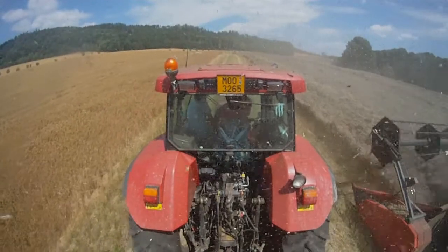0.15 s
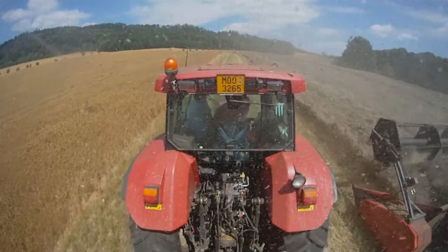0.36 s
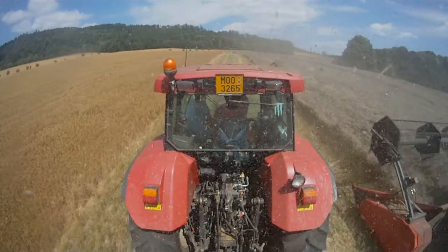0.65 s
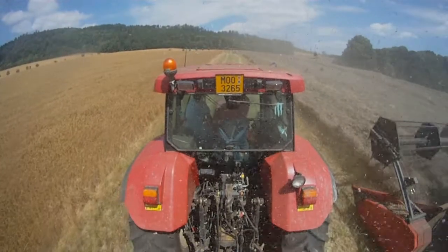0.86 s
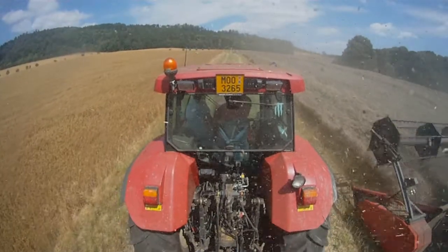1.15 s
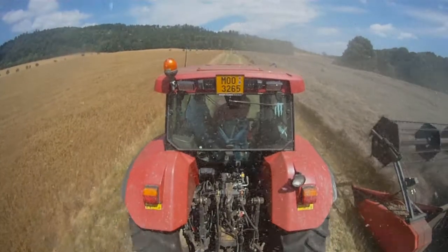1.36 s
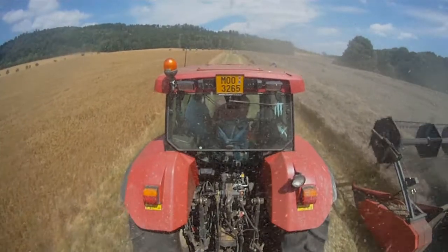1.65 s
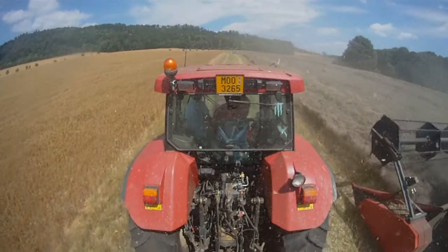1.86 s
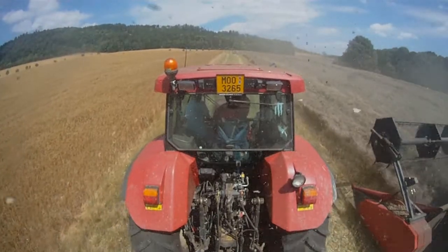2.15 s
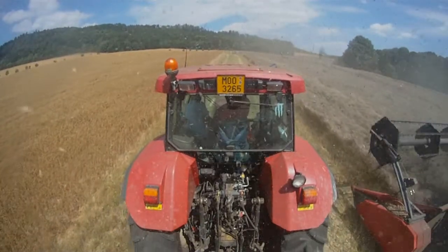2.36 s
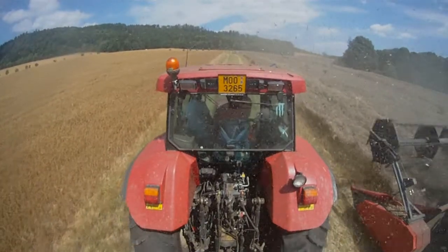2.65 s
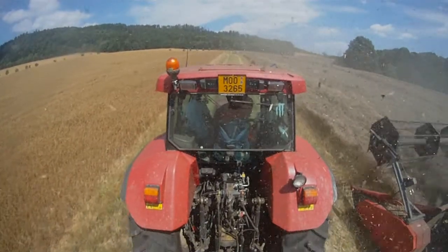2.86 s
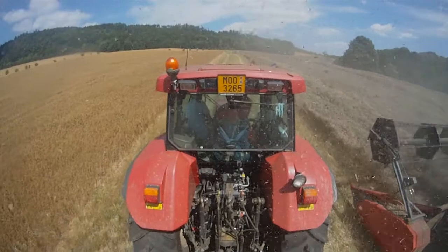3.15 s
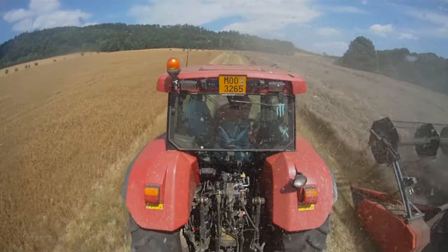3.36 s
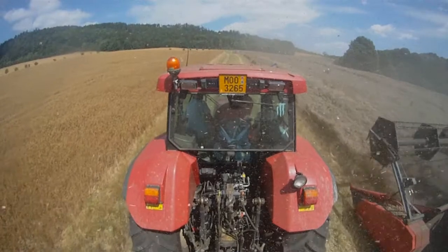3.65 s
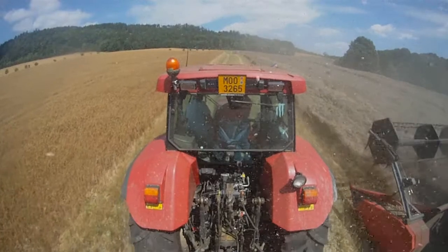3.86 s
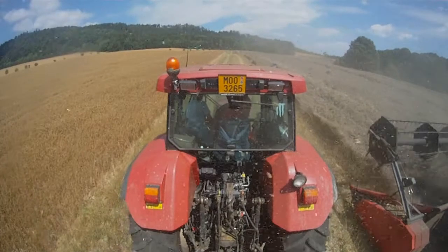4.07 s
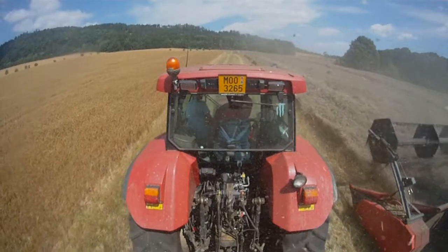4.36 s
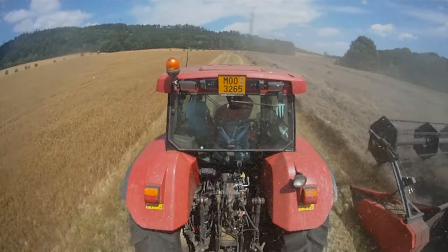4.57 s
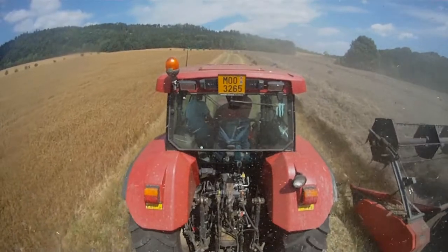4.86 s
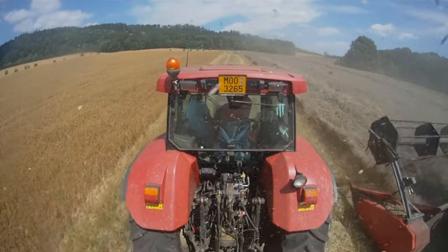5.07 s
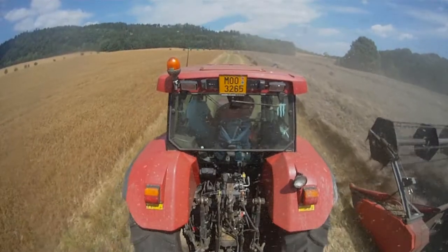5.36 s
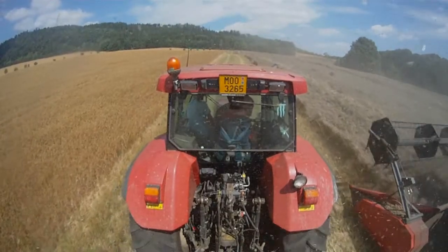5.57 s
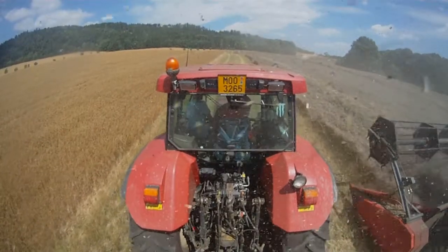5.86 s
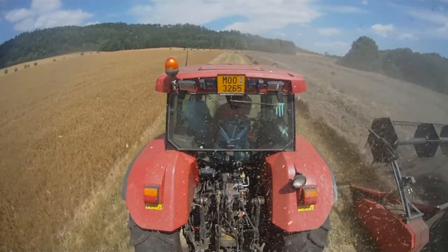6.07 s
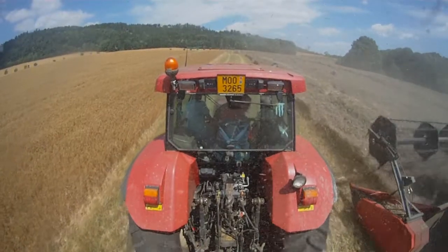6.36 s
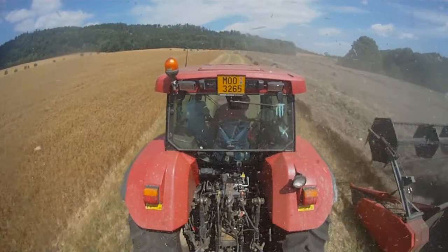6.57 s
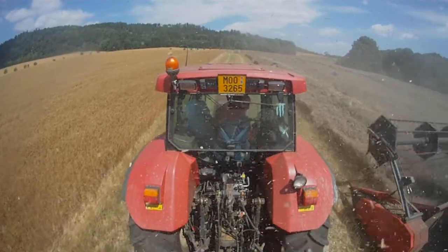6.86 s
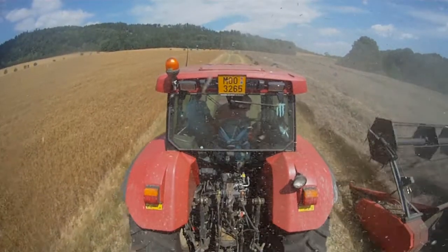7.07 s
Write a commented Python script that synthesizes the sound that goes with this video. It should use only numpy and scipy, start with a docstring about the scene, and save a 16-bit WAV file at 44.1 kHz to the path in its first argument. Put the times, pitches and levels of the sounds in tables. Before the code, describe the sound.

Sharp, bright clicks of kernels on hard plastic sit in front of the continuous roar and whine of a working combine. The microphone rides on a grain trailer in an open field, pelted by chaff. An opening flurry eases, builds into a dense rattling shower, then drops to scattered ticks. The hardest hits distort slightly, and occasional light knocks travel up the mount while the machinery keeps running.

```python
"""Sharp clicks of grain on hard plastic are heard first, over the roar and whine of a working combine.
Kernels and chaff strike the housing of a small camera on a grain trailer, singly and in showers.
Each impact excites the damped normal modes of the shell, and the hardest overload the microphone.
The machines give broadband noise with resonant peaks, wavering tones and a low hum;
now and then a jolt sets the panels ringing or a dull knock travels up the mount."""
import sys
import numpy as np
from scipy import signal
from scipy.fft import rfft, irfft
from scipy.io import wavfile
from scipy.ndimage import uniform_filter1d

SR = 44100
rng = np.random.default_rng(int(sys.argv[2]) if len(sys.argv) > 2 else 0)


def store_wav(level_fs):
    """Save 16-bit WAV to argv[1]."""
    pcm = np.round(np.clip(np.atleast_2d(level_fs), -1, 1) * 32767)
    wavfile.write(sys.argv[1], SR, pcm.T.astype(np.int16))


N = 318843

# broadband roar of the machines: (frequency [Hz], relative spectral density [dB])
ROAR_SPECTRUM = [(15, -58), (25, -34), (99, -26), (173, -19), (433, -19), (1050, -9.5), (1140, -10),
                 (1240, -11.5), (1800, -3), (2560, -14.5), (3090, -5), (4150, -15.5), (5280, -13),
                 (8350, -22), (15500, -46)]
# whines of shafts, fans and shell: (frequency [Hz], width [Hz], relative level [dB])
WHINE_BANDS = [(172, 9.7, -27), (290.4, 11, -32), (701.6, 120, -18), (1433, 180, -10.5), (1739, 56, -8),
               (1825, 94, -6), (1895, 23, -8.5), (2026, 230, -10), (2000, 18, -17), (3270, 260, -19.5),
               (4490, 110, -18.5), (5120, 1300, -7)]
# uncorrelated stereo part of the roar: (frequency [Hz], side relative to mid [dB])
ROAR_SIDE = [(40, -3), (110, -8), (200, -12), (380, -16), (780, -21), (950, -90)]
# envelope of the roar: (time [s], level [dB])
ROAR_ENVELOPE = [(0, -26), (1.09, -26.5), (1.9, -28), (2.54, -25.5), (3.4, -28), (3.92, -26.5),
                 (4.5, -28.5), (6.1, -29), (7.23, -29.5)]
# squeaks of a belt or bearing: (centre time [s], half duration [s], level [dB])
SQUEAKS = [(.95, .07, -44), (6.08, .04, -38)]
# faint tones of the shafts: (frequency [Hz], level [dB])
SHAFT_TONES = [(481, -58), (718, -58), (938, -55), (1120, -52)]
# normal modes of the housing: (frequency [Hz], relative level [dB], nominal 60 dB decay time [s])
SHELL_MODES = [(1743, -12.5, 0.023), (1847, -13, .02), (2144, -8.5, 0.015), (1484, -20.5, 0.0085),
               (2420, -11.5, 0.011), (2950, -6, 0.024), (3286, -10.5, 0.026), (3944, -9, 0.021),
               (4466, -7, 0.019), (5140, -6.5, 0.018), (5330, -7.5, 0.015), (5890, -11, 0.02),
               (6370, -0.5, 0.0086), (7146, -6.5, 0.0091), (8280, -1.5, 0.0074), (9270, -5.5, 0.0048),
               (9820, -11.5, 0.009), (11170, -8, 0.0072), (13400, -26, .003)]
# normal modes of the mount: (frequency [Hz], relative level [dB], nominal 60 dB decay time [s])
MOUNT_MODES = [(174, 0.5, 0.064), (340, -22, 0.06), (467, -17.5, 0.075), (724, 5, 0.028),
               (1010, -1.5, 0.024)]
# soft jolts of the machinery: (time [s], gain [dB])
MACHINE_JOLTS = [(0.466, 1), (0.742, -2), (1.718, -9), (1.9905, -4), (2.049, -6), (2.319, -1.5),
                 (2.4605, 1), (3.9978, -1.5), (4.2146, -2), (4.341, -3.5), (6.4313, -7), (7.064, -13.5)]
# knocks through the mount: (time [s], gain [dB], extra gain of the lowest mode [dB])
MOUNT_KNOCKS = [(0.588, -22, -24), (0.819, -24.5, -25), (1.745, -28, -11), (2.529, -17, -15),
                (2.603, -26, -11), (2.76, -23, -25), (3.188, -22, -16), (3.756, -20, -9), (4.077, -21, -30),
                (4.259, -20, -39), (4.574, -28, -24), (4.763, -19, -7.5), (5.765, -30, -2),
                (5.843, -22.5, -7.5), (6.768, -22, -6)]
# envelope of the shower of chaff and small grain: (time [s], level [dB])
SHOWER_ENVELOPE = [(0.0, -36.5), (0.35, -24.5), (0.78, -33.5), (1.2, -37), (1.45, -32.5), (1.75, -41),
                   (2.1, -48), (2.35, -27), (2.75, -18.5), (2.95, -28), (3.05, -36), (3.42, -25.5),
                   (3.6, -36.5), (4.35, -39.5), (4.95, -43.5), (5.25, -34), (5.64, -37), (6.0, -36.5),
                   (7.23, -34.5)]
# denser handfuls on top of the shower: (onset [s], duration [s], level [dB])
CHAFF_HANDFULS = [(0.188, 0.041, -23.5), (0.293, 0.024, -28), (0.356, 0.039, -24), (0.434, 0.039, -22.5),
                  (0.54, .03, -23), (1.087, 0.055, -25.5), (1.48, .17, -29), (2.175, 0.084, -23.5),
                  (2.384, 0.052, -15), (2.587, 0.095, -24), (2.814, 0.087, -22), (3.107, .1, -21.5),
                  (3.285, 0.027, -24), (5.038, 0.086, -29), (5.386, 0.087, -35), (5.98, .13, -32),
                  (6.655, 0.074, -28.5), (6.866, 0.043, -33.5)]
# the loudest kernels: (time [s], gain before clipping [dB], centre of the ring [Hz],
# low modes relative to upper [dB], nominal contact time [ms])
KERNEL_IMPACTS = [(0.0224, 11, 5330, -12.5, 4), (0.0317, 4, 4460, -13, 1.8),
                  (0.1242, 6.5, 6030, -11.5, 2.2), (0.1955, -1, 4340, -12, 2.8),
                  (0.1995, -5.5, 5200, -18, 5.4), (0.2138, -6, 5550, -15, 3), (0.2311, -1, 5070, -20, 3.8),
                  (0.3348, 4, 5000, -8, 2.5), (0.347, 1.5, 6380, -9, 1.7), (0.352, 7, 6400, -14.5, 2.5),
                  (0.3656, -7, 6340, -8, 2.5), (0.4263, -2.5, 5250, -16, 1.7), (0.4358, -6, 6540, -10, 2.8),
                  (0.4487, -5.5, 5380, -4.5, 3.2), (0.4544, -8, 5090, -12, 3.2),
                  (0.5, -7.5, 5300, -10, 2.5), (0.5356, -4.5, 5200, -9, 2.3), (0.591, 4, 6300, -17, 2.5),
                  (0.6724, -2, 5100, -11.5, 3), (0.824, 8, 4490, -12, 1.4), (1.0155, -12, 4430, -10, 2.5),
                  (1.0861, -12.5, 5030, 0, 3.5), (1.1043, -3, 6450, -7, 2.7), (1.114, -3, 5280, -9, 1.8),
                  (1.128, 0, 4490, -11.5, 3.8), (1.1806, -11, 5600, -10, 2.5),
                  (1.349, -8.5, 6070, -22, 2.1), (1.75, 12.5, 5900, -7.5, 2.27),
                  (2.1797, -9, 5200, -7, 1.9), (2.198, -4, 4900, -7, 2.5), (2.2093, -14, 6040, -8, 2.5),
                  (2.2203, -1, 6440, -10.5, 3.4), (2.2332, -2.5, 4980, -14, 2.2),
                  (2.2438, -1, 5110, -21, 1.9), (2.2843, -3, 6200, -9, 2.9), (2.3339, -6.5, 5100, -9, 2.5),
                  (2.3457, -5.5, 4490, -8, 3.3), (2.3582, -5.5, 5180, -7, 2.8),
                  (2.3895, -13, 4750, -10, 3.3), (2.396, -6, 6430, -3.5, 3.4), (2.4006, -9, 6370, -10, 3.2),
                  (2.4127, -5, 5280, -12, 2.8), (2.4184, -5, 4440, -17, 3), (2.423, 4.5, 5080, -15, 1.8),
                  (2.429, 5, 6370, -20, 2.2), (2.4494, -3, 4940, -12, 2.1), (2.4578, 1.5, 5160, -18, 3.2),
                  (2.474, -4, 5170, -12, 2.8), (2.4857, 1, 5100, -13.5, 2.8), (2.4954, 4, 4430, -19, 1.9),
                  (2.5153, -7, 5190, -12, 2.5), (2.5363, 0, 5100, -7, 2.5), (2.581, 0.5, 6300, -10, 1.6),
                  (2.599, -4, 5260, -4, 2.2), (2.605, 4, 5150, -9, 3.1), (2.6199, -5, 4490, -4, 1.7),
                  (2.6288, -1, 5230, -12, 3), (2.635, -5, 5240, -10, 2.2), (2.6407, -1, 6260, -11, 3),
                  (2.6606, -4.5, 5320, -6, 2.1), (2.705, -7, 6600, -12, 2.5), (2.7093, -11, 5750, -10, 1.7),
                  (2.7124, 5, 5140, -8.5, 2.1), (2.7316, -2.5, 6260, -9, 2.5), (2.7515, -3, 6350, -17, 3.9),
                  (2.7586, 0, 5150, -12, 2.5), (2.7654, 10, 4460, -19, 1.15), (2.7794, -4, 5170, -18, 2.5),
                  (2.808, -6, 5220, -10, 2.5), (2.826, -5, 6410, -15, 1.9), (2.8333, -2, 6250, -18, 1.7),
                  (2.8407, 1, 5300, -15, 3.7), (2.8616, -1, 5210, -12, 2.2), (2.872, -3, 5190, -11, 2.5),
                  (2.8863, 8.5, 5350, -19, 2.05), (2.9131, -1, 4620, -8, 1.8),
                  (2.9283, -3.5, 5250, -17, 2.1), (2.9943, -4, 5110, -8.5, 2.3),
                  (3.0584, -9, 5170, -13, 2.8), (3.074, -7, 4470, -12, 3.1), (3.1094, -2.5, 4540, -12, 1.8),
                  (3.1321, 4.5, 5250, -11, 2.8), (3.1553, 0.5, 6340, -12, 3.3),
                  (3.1605, 1.5, 5530, -12, 2.4), (3.1641, 1, 5150, -20, 3.4), (3.1775, -1, 5250, -15, 3.1),
                  (3.194, 4, 6360, -12.5, 3.3), (3.2064, 0, 5400, -18, 2.5), (3.2641, -4, 5430, -19, 2.5),
                  (3.3008, -5, 5160, -17, 3.5), (3.3086, -3, 4870, -12, 2.5), (3.345, -6, 5210, -12, 2.5),
                  (3.3605, 1.5, 4550, -21, 2.8), (3.3816, -5.5, 5170, -15, 3.3),
                  (3.4213, -9, 6340, -18, 2.5), (3.434, -2.5, 6300, -13, 2), (3.4627, -8.5, 5180, -14, 2.1),
                  (3.482, -11, 5240, -15, 2.5), (3.5796, -2, 5600, -17, 2.5), (3.6198, 3.5, 4600, -17, 2.1),
                  (3.659, 6, 6150, -11.5, 1.8), (3.7312, -12, 6460, -12, 2.7), (3.7591, 8, 5040, -11, 1.6),
                  (3.78, -5, 6380, -9, 3.2), (3.7973, -0.5, 5270, -22, 3.2), (3.806, -7, 5160, -16, 2.5),
                  (3.8267, -2.5, 5170, -8, 1.5), (3.8649, 4, 5800, -18.5, 4.6),
                  (3.9064, 5.5, 5330, -29, 1.9), (3.9426, -3.5, 4700, -11, 2), (3.9762, 2, 5300, -22, 3),
                  (4.0266, -1, 5500, -17, 3.6), (4.069, 2, 4870, -15, 1.5), (4.076, 2.5, 5770, -11, 2.3),
                  (4.0814, -0.5, 5130, -9, 2.7), (4.2636, 8.5, 5000, -27, 2.6),
                  (4.2815, -4, 5630, -19, 2.5), (4.3235, -3.5, 6530, -15, 0.94),
                  (4.5783, -0.5, 5430, -15, 1.4), (4.588, -3.5, 5330, -14, 2.2),
                  (4.6953, -12, 4500, -21, 2.7), (5.0388, -11, 6380, -5.5, 1.6),
                  (5.082, -10, 6430, -12, 2.5), (5.1087, -8.5, 5660, -11, 1.8),
                  (5.2088, -12.5, 5050, -12, 2.5), (5.2806, 1, 5600, -25, 0.83),
                  (5.3835, -11.5, 5240, -6, 3.6), (5.447, -3, 6370, -9, 3.8), (5.6526, -13, 5070, -16, 2.3),
                  (5.7372, -2.5, 5240, -17, 3.6), (5.782, -10.5, 5060, -6, 1.9),
                  (5.9813, -2.5, 5240, -16, 1.8), (6.4524, -6, 5290, -24, 2.7), (6.5062, 3, 5800, -23, 3.1),
                  (6.6673, -8.5, 5250, -5, 2.9), (6.6944, -3.5, 5330, -16, 2.5),
                  (6.715, -1.5, 6440, -9.5, 1.7), (6.7407, -7, 4400, -12, 1.03),
                  (6.7798, -6.5, 4900, -17, 2.1), (7.0725, -13.5, 4540, -5, 3.3)]
# stereo imbalance of the bass: (frequency [Hz], left relative to right [dB], left phase lead [rad])
BASS_IMBALANCE = [(40, 4, -.1), (110, 2.4, -.4), (200, 1.5, -.4), (400, .3, -.22), (750, 0, -.09),
                  (950, 0, 0)]

GRIT_SAMPLES = 300
IMPACT_DRAWS = GRIT_SAMPLES + 3 * len(SHELL_MODES)  # contact noise, then three draws a mode


def gain_of(db):
    """Amplitude grows tenfold for every 20 dB."""
    return 10 ** (np.asarray(db) / 20)


def unit_rms(x):
    """Division by the root mean square gives a signal unit power."""
    return x / np.sqrt(np.mean(x ** 2) + 1e-20)


def spectrum_at(points, hz):
    """Interpolation on a logarithmic frequency axis joins the points of a spectrum."""
    f, value = np.transpose(points)
    return np.interp(np.log(hz + 1), np.log(f + 1), value)


def envelope(curve):
    """Interpolation in decibels turns (time [s], level [dB]) into a gain per sample."""
    return gain_of(np.interp(np.arange(N) / SR, *np.transpose(curve)))


def wander(shape, samples):
    """Two moving averages low-pass white noise into a slow random fluctuation."""
    return uniform_filter1d(uniform_filter1d(rng.standard_normal(shape), samples), samples)


def add(mix, start_s, sound):
    """Superposition: a sound adds to the mix from its onset."""
    part = mix[round(start_s * SR):][:len(sound)]
    part += sound[:len(part)]


def ring(modes, extra_db, decay_scale, draws, rise_s):
    """Free vibration is a sum of damped sines; the spot struck sets their level, tuning and phase."""
    hz, db, t60 = np.array(modes).T[:, :, None]
    t = np.arange(1800) / SR
    strength, tuning, phase = draws.reshape(3, -1, 1)
    decay = gain_of(db + extra_db[:, None] + 2.44 * strength - 60 * t / (t60 * decay_scale))
    partials = decay * np.sin(2 * np.pi * hz * (1 + 0.032 * tuning) * t + 0.76 * phase)
    return partials.sum(0) * (1 - np.exp(-t / rise_s))


def machine_roar():
    """Incoherent sources add in power: broadband noise and narrow whines, wide only in the bass."""
    frames, hz = N // 512 + 5, np.fft.rfftfreq(2048, 1 / SR)
    mid_re, mid_im, side_re, side_im, patches = rng.standard_normal((frames, 1025, 5)).T
    patches = unit_rms(uniform_filter1d(uniform_filter1d(patches, 9, 0), 6, 1))
    density = gain_of(spectrum_at(ROAR_SPECTRUM, hz)) ** 2
    power = gain_of(-2.0) ** 2 * density / density.sum()
    for centre_hz, width_hz, db in WHINE_BANDS:
        peak = 1 / (1 + (2 * (hz - centre_hz) / width_hz) ** 2) ** 2
        power += gain_of(db) ** 2 * peak / peak.sum()
    side_gain = gain_of(spectrum_at(ROAR_SIDE, hz))[:, None]
    spectra = np.array([mid_re + 1j * mid_im, side_gain * (side_re + 1j * side_im)])
    spectra *= np.sqrt(power)[:, None] * gain_of(1.65 * patches)  # patches of the spectrum flicker
    mid, side = signal.istft(spectra, nperseg=2048, noverlap=1536)[1][:, :N]
    return envelope(ROAR_ENVELOPE) * np.array([mid + side, mid - side]) / mid.std()


def engine_hum(drift, flutter, hz=37.5, left_right_db=(-61.5, -86)):
    """Slow frequency and amplitude modulation make the engine's low sine waver."""
    hum = np.sin(2 * np.pi * np.cumsum(hz + 1.3 * drift) / SR) * (1 + .25 * flutter)
    return gain_of(left_right_db)[:, None] * hum


def shaft_tones():
    """Random modulation of amplitude and phase spreads each shaft's tone into a narrow band."""
    sway = wander((2, len(SHAFT_TONES), N), 2500)
    hz, db = np.array(SHAFT_TONES).T[:, :, None]
    tone = np.exp(2j * np.pi * hz * np.arange(N) / SR) * (sway[0] + 1j * sway[1]) / sway.std()
    return (gain_of(db) * tone.real).sum(0)


def belt_squeal(drift, flutter, hz=1149, steady_db=-45):
    """A belt or bearing sings as a carrier with noise sidebands; in a squeak the pure carrier swells."""
    t = np.arange(N) / SR
    carrier = np.exp(2j * np.pi * np.cumsum(hz + 4.46 * drift) / SR)
    steady = gain_of(steady_db) * unit_rms((carrier * (1 + 0.71 * flutter)).real)
    swell = sum(gain_of(db) * np.exp(-((t - s) / half_s) ** 4) for s, half_s, db in SQUEAKS)
    return steady + swell * np.sqrt(2) * carrier.real


def machine_jolts():
    """A slow push excites only low modes: two panel resonances ring, longer than after a kernel."""
    out = np.zeros(N)
    for s, db in MACHINE_JOLTS:
        draws = 0.55 * rng.standard_normal(3 * 2)
        add(out, s, gain_of(db) * ring(SHELL_MODES[:2], np.zeros(2), 3.4, draws, rise_s=0.0043))
    return out


def mount_knocks():
    """Structure-borne sound: bumps travel up the mount and excite its low, dull modes."""
    out = np.zeros(N)
    for s, db, thump_db in MOUNT_KNOCKS:
        draws = 0.17 * rng.standard_normal(3 * len(MOUNT_MODES))
        extra_db = np.where(np.arange(len(MOUNT_MODES)) == 0, thump_db, 0)
        add(out, s, gain_of(db) * ring(MOUNT_MODES, extra_db, 0.95, draws, rise_s=0.0036))
    return out


def impact(centre_hz, low_db, contact_ms, draws):
    """The shell's response is the convolution of a husk's brief crunch with its modal ringing."""
    grit, spot = draws[:GRIT_SAMPLES], draws[GRIT_SAMPLES:]
    t_ms = np.arange(GRIT_SAMPLES) / (SR / 1000)
    width_ms = np.clip(0.63 * contact_ms - .4, .1, 5)
    spectrum = rfft(grit * np.exp(-(t_ms / width_ms) ** 2), 1024)
    whitened = spectrum / abs(spectrum) ** .75  # a crunch holds all pitches about evenly
    crunch = irfft(whitened)[:400] * np.hanning(800)[400:]
    hz = np.array(SHELL_MODES)[:, 0]
    is_low = hz < 2600  # the panel modes
    emphasis_db = -9.0 * np.log2(hz / centre_hz) ** 2  # favours modes near the husk's own pitch
    upper = ring(SHELL_MODES, np.where(is_low, -200, emphasis_db), 0.87, spot, rise_s=0.00005)
    lower = ring(SHELL_MODES, np.where(is_low, 0, -200), 0.97, spot, rise_s=0.00027)
    upper, lower = np.convolve(upper, crunch), np.convolve(lower, crunch)
    return upper / abs(upper).max() + gain_of(low_db) * lower / abs(lower).max()


def chaff_envelope(edge_s=0.0036):
    """The slow shower and the abrupt handfuls are incoherent, so their powers add."""
    t = np.arange(N) / SR
    handfuls = sum(gain_of(db) * np.clip(np.minimum(t - s, s + length - t) / edge_s, 0, 1)
                   for s, length, db in CHAFF_HANDFULS)
    return np.hypot(envelope(SHOWER_ENVELOPE), handfuls)


def chaff(impacts_per_s=1600., spread_db=5.5, spots=24):
    """Shot noise: small impacts of uneven size arrive at random on many spots of the shell."""
    sizes = gain_of(spread_db * np.minimum(rng.exponential(1, N), 4))
    impulses = sizes * (rng.random(N) < impacts_per_s / SR)
    spot, out = rng.integers(0, spots, N), np.zeros(N)
    for k in range(spots):
        draws = rng.standard_normal(IMPACT_DRAWS)
        centre_hz = 5500 * gain_of(1.33 * draws[-1])
        tap = impact(centre_hz, low_db=-13.5, contact_ms=1.19, draws=draws)
        out += signal.oaconvolve(impulses * (spot == k), tap)[:N]
    return chaff_envelope() * unit_rms(out)


def kernels():
    """Impulsive excitation: each stray kernel draws one loud click from the housing."""
    out = np.zeros(N)
    for s, db, centre_hz, low_db, contact_ms in KERNEL_IMPACTS:
        draws = rng.standard_normal(IMPACT_DRAWS)
        add(out, s, gain_of(db) * impact(centre_hz, low_db, contact_ms, draws))
    return out


def scene():
    """All sources superpose at one microphone, whose capsule saturates on the hardest impacts."""
    strikes = np.clip(kernels() + chaff(), -1.05, 1.05)
    # a high-pass keeps the clipped clicks thin and free of bass thumps
    strikes = signal.sosfilt(signal.butter(4, 1100, "high", fs=SR, output="sos"), strikes)
    roar = machine_roar()
    drift, flutter, quadrature = map(unit_rms, wander((3, N), 1800))
    tones = engine_hum(drift, flutter) + belt_squeal(drift, flutter + 1j * quadrature) + shaft_tones()
    return roar + tones + mount_knocks() + machine_jolts() + strikes


def record(dry, cutoff_hz=15700):
    """Level and phase differences shift the bass to one side; peaks clip and a low-pass limits the band."""
    hz, rows = np.fft.rfftfreq(N, 1 / SR), np.array(BASS_IMBALANCE)
    level_db, lead_rad = spectrum_at(rows[:, :2], hz), spectrum_at(rows[:, ::2], hz)
    left = gain_of(level_db / 2) * np.exp(.5j * lead_rad)  # each channel takes half the difference
    stereo = irfft(rfft(dry) * [left, 1 / left], N)
    lowpass = signal.firwin(255, cutoff_hz, window=("kaiser", 7), fs=SR)
    return np.clip(signal.oaconvolve(np.clip(stereo, -1, 1), lowpass[None], "same"), -1, 1)


dry = scene()
out = record(dry)
store_wav(out)
```